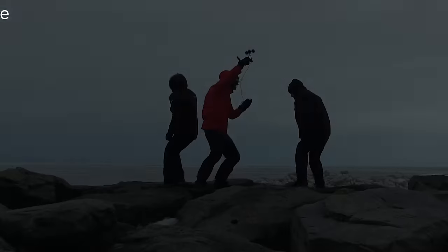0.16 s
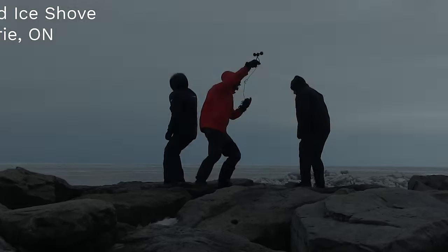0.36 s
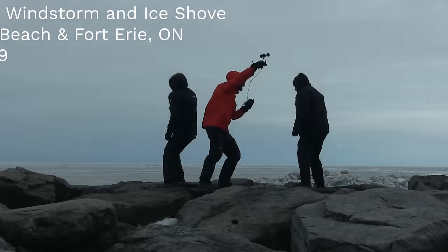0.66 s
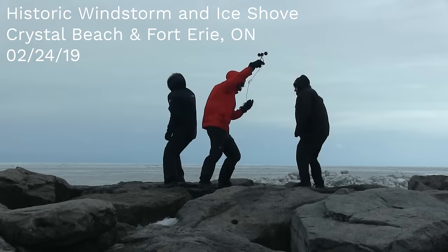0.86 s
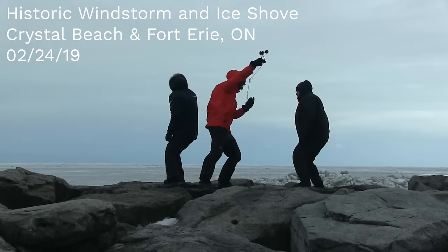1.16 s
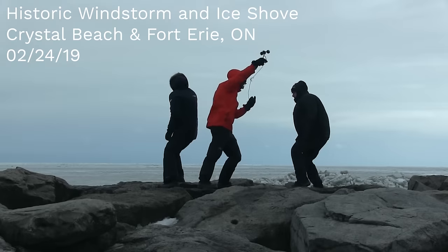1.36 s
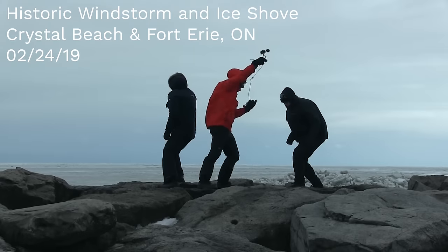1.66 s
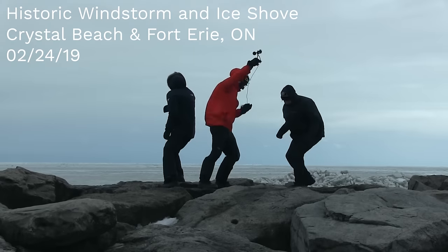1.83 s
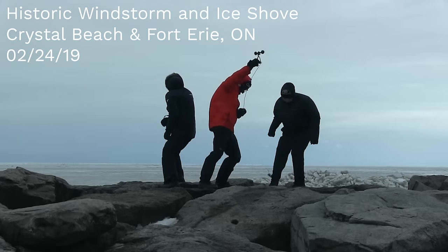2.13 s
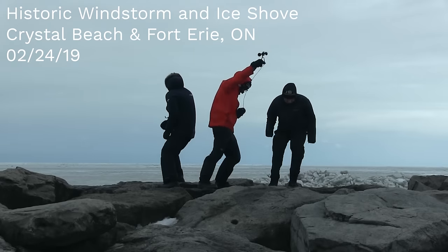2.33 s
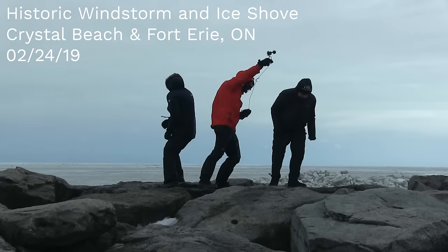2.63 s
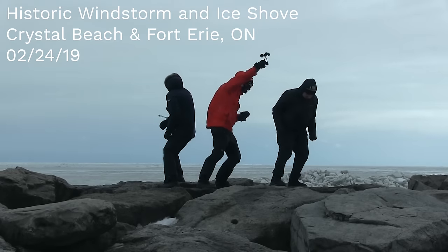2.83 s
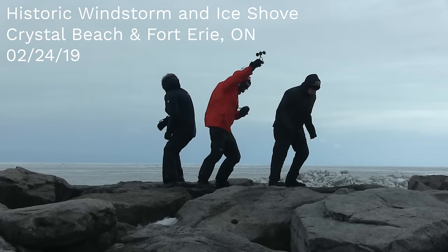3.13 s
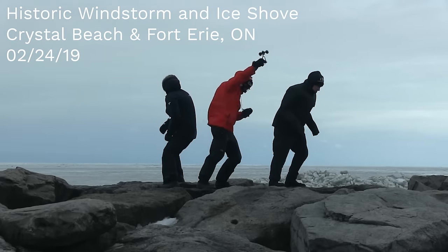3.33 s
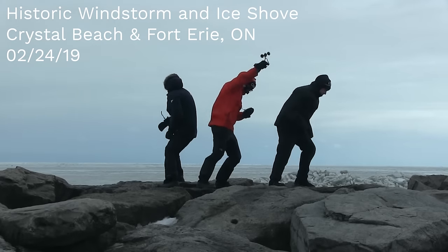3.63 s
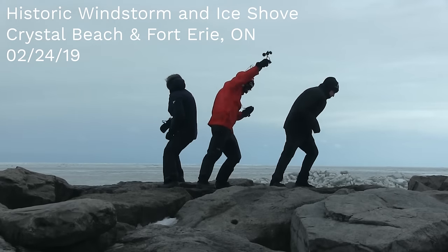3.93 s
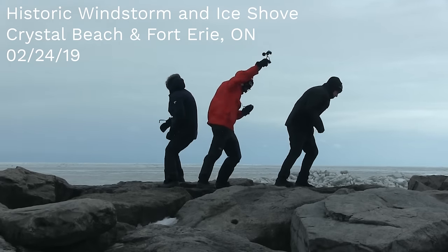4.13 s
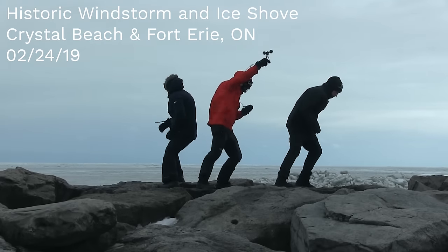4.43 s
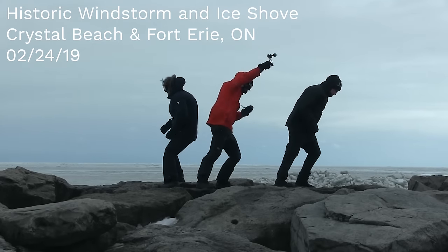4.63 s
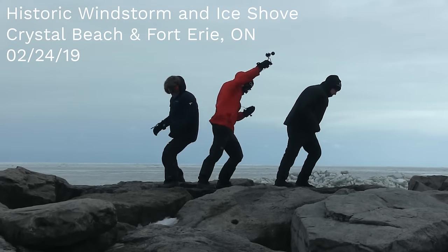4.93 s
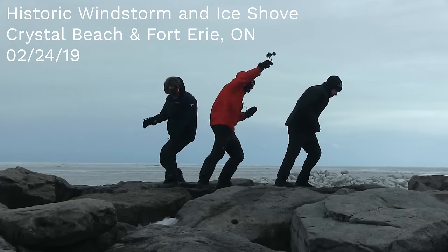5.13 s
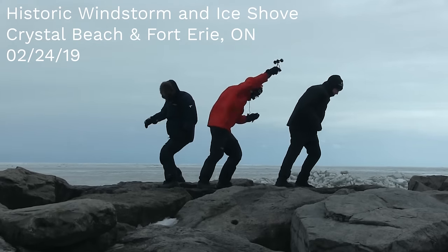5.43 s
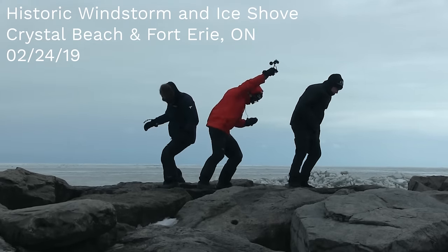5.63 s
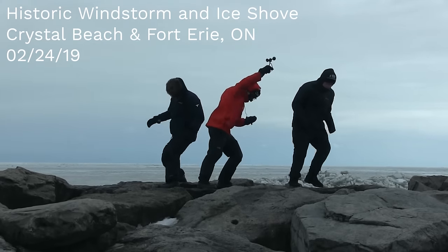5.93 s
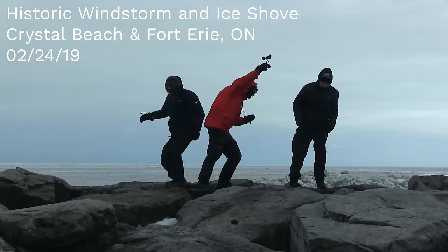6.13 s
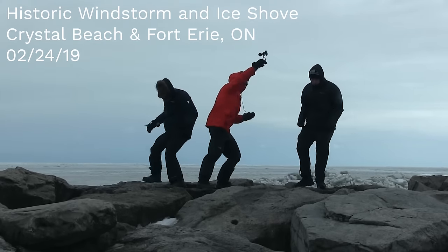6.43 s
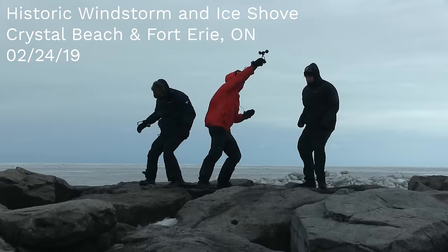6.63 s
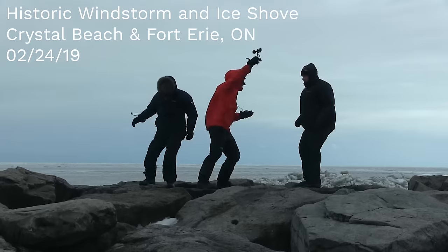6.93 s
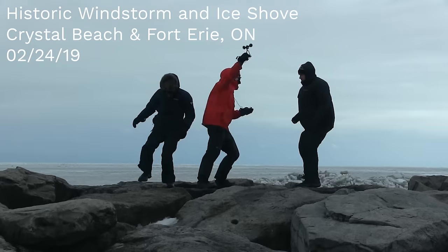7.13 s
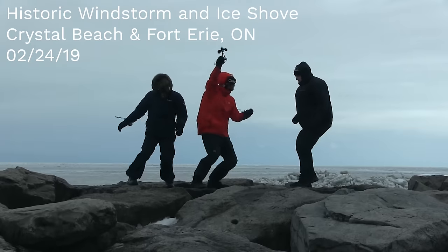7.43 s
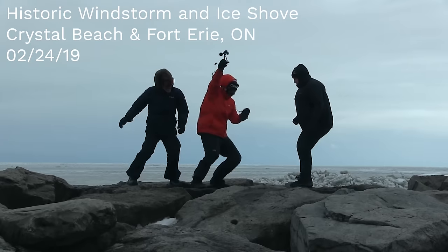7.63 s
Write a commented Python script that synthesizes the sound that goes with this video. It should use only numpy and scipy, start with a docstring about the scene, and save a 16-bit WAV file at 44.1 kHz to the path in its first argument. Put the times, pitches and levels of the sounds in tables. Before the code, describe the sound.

Storm wind on an open shore fades in over the first half second and blows across the microphone as a loud, deep roar for nearly eight seconds. It swells and dips unevenly, with low buffeting underneath, a thin hiss on top and very faint scattered ticks of grit. A faint whistle rides the gusts and weakens at about 3.5 seconds. Near 1.7 seconds loose clothing snaps and a bright spatter of spray or grit strikes the microphone. The gusts are strongest around 2, 3.5 and 7.2 seconds. More short cloth flaps come at about 4.4, 5.4, 5.9 and 6.5 seconds, with light patters scattered between 4 and 7 seconds. Hard gusts thump the microphone at about 4.5 seconds, most strongly at 5.5, and twice just after 7. The roar continues to the end.

```python
"""A deep, gusting roar: storm wind on an open shore blows across a pair of microphone ports.
Big eddies buffet, smaller ones roar, rush and whoosh through the cavities of the housing, the finest
turbulence hisses, and the port edges whistle faintly until the wind veers. Now and then the hardest
eddies thump the diaphragms, loose cloth flaps, and spray or grit patters on the housing."""
import sys
import numpy as np
from scipy import signal
from scipy.fft import rfft, irfft, next_fast_len
from scipy.io import wavfile

SR = 44100
rng = np.random.default_rng(int(sys.argv[2]) if len(sys.argv) > 2 else 0)


def wrap_up_sound(samples):
    """Save the sound to the file named by the first command line argument, as 16-bit audio."""
    columns = np.atleast_2d(samples).T
    # keep every value between -1 and 1, then stretch to whole-number steps
    tamed = np.clip(columns, -1, 1)
    steps = np.round(tamed * 32767).astype(np.int16)
    wavfile.write(sys.argv[1], SR, steps)


N = 342657

# strength of the gusts: time_s, rush_db, roar_over_rush_db, hiss_over_rush_db
GUSTS = [(0.4, -23, 7.5, -22), (0.62, -21.5, 5.5, -21.5), (1.1, -22, 6.5, -22), (1.5, -21.5, 8.5, -24.5),
         (1.9, -19, 5.5, -23), (2.1, -21, 8, -24.5), (2.36, -20, 7.5, -26.5), (2.56, -24, 8, -24),
         (3.15, -22.5, 5.5, -25), (3.45, -20, 6, -25.5), (3.63, -19.5, 6, -25.5), (3.73, -25, 11, -23.5),
         (4.2, -23.5, 10.5, -25), (4.55, -23.5, 7.5, -25), (4.8, -21.5, 8.5, -26), (5.05, -24, 9, -24.5),
         (5.3, -26.5, 9, -24.5), (5.5, -24.5, 9, -23.5), (5.75, -26.5, 8, -25), (6.05, -23.5, 7, -23.5),
         (6.3, -27.5, 10.5, -23.5), (6.42, -23.5, 8.5, -23.5), (6.52, -21.5, 7, -22.5),
         (6.88, -25, 8.5, -22), (7.05, -22.5, 8.5, -23), (7.17, -19, 7.5, -22.5), (7.26, -21.5, 6.5, -22),
         (7.38, -21, 6.5, -23), (7.58, -24.5, 11.5, -23), (7.77, -26.5, 9, -27)]
# likeness of the pressure at the two ports: frequency_hz, correlation (0-1)
PORT_CORRELATION = [(25, .99), (42, 0.93), (65, 0.83), (130, 0.92), (290, 0.87), (640, 0.72), (1300, 0.8),
                    (2200, 0), (3300, 0.56), (6800, 0.52), (15000, 0.67)]


def wind():
    """Turbulence: smaller eddies sound higher, and cavity resonances colour their pressure noise."""
    # spectrum of the turbulence: frequency_hz, density_db
    turbulence = [(11, -46), (18, -29), (42, -6.5), (85, -7.5), (150, 2.5), (243, -3.5), (313, -3.5),
                  (820, -14.5), (1400, -22), (1810, -25.5), (2470, -31.5), (3190, -31.5), (4740, -45),
                  (9890, -59), (15600, -73)]
    # resonances of the housing: centre_hz, width_hz, lift_db
    cavities = [(184, 58, 3), (307, 250, 3.5), (747, 53, 3.5), (1037, 200, 3.5), (1335, 170, 5),
                (1490, 150, 5.5), (3550, 90, 1), (4050, 200, 1), (4830, 500, -1), (5700, 600, 3),
                (6600, 400, 2.5), (7200, 300, -1.5), (8200, 130, 1.5), (9100, 300, 1), (10030, 150, 3)]
    # band of each eddy size: low_hz, high_hz
    eddy_bands = [(25, 100), (100, 220), (220, 560), (560, 1900), (2200, 4600), (4600, 9000), (9000, 15000)]
    # spread of the level flicker: frequency_hz, shared_db, own_db
    flicker = [(30, 0, 1), (300, 0.9, 0.35), (2000, 0.8, 0.35), (12000, 0.7, 0.9)]
    size = next_fast_len(N)
    hz = bin_frequencies(size)
    colour_db = at_hz(turbulence, hz)
    for centre_hz, width_hz, lift_db in cavities:
        colour_db = colour_db + lift_db * resonance(hz, centre_hz, width_hz)
    pressure = from_db(colour_db) * stereo_noise(hz, size, at_hz(PORT_CORRELATION, hz))
    power = 2 * np.abs(pressure.mean(0)) ** 2 / size ** 2
    eddy_gains_db = [level_db - 10 * np.log10(power[(hz > low) & (hz < high)].sum())
                     for level_db, (low, high) in zip(eddy_levels(), eddy_bands)]
    eddy_octaves = np.log2([np.sqrt(low * high) for low, high in eddy_bands])
    eddies = np.arange(len(eddy_bands))
    shared_drift = drift(corner_hz=14.6)
    out, step_octaves = 0, .7
    for octave in np.arange(4, 14.6, step_octaves):
        band = np.clip(1 - np.abs(np.log2(hz) - octave) / step_octaves, 0, 1)
        place = np.interp(octave, eddy_octaves, eddies)
        weights = np.clip(1 - np.abs(place - eddies), 0, 1)   # blend the two nearest eddy sizes
        shared_db, own_db = at_hz(flicker, 2 ** octave)
        gain_db = weights @ eddy_gains_db + shared_db * shared_drift + own_db * drift(corner_hz=3.0)
        out = out + from_db(gain_db) * irfft(band * pressure, size)[:, :N]
    return out


def eddy_levels():
    """Energy cascade: a gust feeds eddies of every size. Levels in dB, largest eddies first."""
    # division of the roar: time_s, deep_over_roar_db, upper_over_roar_db
    roar_halves = [(0, -2, -2), (1.1, -2.5, -1), (1.6, -6.5, -4), (2.3, -4, -1), (2.9, -0.5, -0.5),
                   (3.5, -5, -2.5), (4.0, -5, -2), (4.7, -2, -1.5), (5.1, -5, -2.5), (5.5, -3, -1.5),
                   (5.9, -2, -2.5), (6.3, -4.5, -4.5), (6.6, -4.5, -3), (7.1, -3.5, -1), (7.4, -3.5, -3),
                   (7.77, -5, -2.5)]
    # largest and smallest eddies: time_s, buffet_over_roar_db, finest_over_hiss_db
    extremes = [(0, -9, -12.5), (.6, -11, -8.5), (1.2, -13.5, -7), (1.9, -11, -8), (2.6, -8, -6.5),
                (3.2, -15, -7), (3.8, -11, -11), (4.4, -10, -9), (4.9, -13, -8.5), (5.5, -8.5, -8.5),
                (6.0, -10, -7), (6.6, -11.5, -8), (7.0, -13, -8.5), (7.2, -14, -8.5), (7.45, -17, -11),
                (7.77, -6, -5)]
    rush, roar_over, hiss_over = in_time(GUSTS)
    roar, hiss = rush + roar_over, rush + hiss_over
    deep, upper = in_time(roar_halves)
    buffet_over, finest_over = in_time(extremes)
    roar_lift, buffet_lift = shoves()
    swing = 0.97 * rush + 0.03 * hiss
    whoosh = -40 + swing - swing.mean()
    return [roar + buffet_lift + buffet_over, roar + roar_lift + deep, roar + roar_lift + upper,
            rush, whoosh, hiss, hiss + finest_over]


def shoves():
    """Dynamic pressure: a big eddy hitting square on shifts roar and buffet along a bell curve in dB."""
    # eddy impacts: time_s, roar_lift_db, buffet_lift_db
    impacts = [(.46, 1.5, 2), (.89, 0.5, -5), (1.05, 0.5, 4), (1.33, 2, 6), (1.69, 4, 0), (1.82, 3.5, 7),
               (2.2, 3, -2), (2.29, 1.5, -3), (2.4, 0, 3), (2.47, 0.5, -2), (2.84, 2.5, 6), (3.27, 2.5, 9),
               (3.48, 6.5, 5), (3.58, 3.5, 8), (3.92, 5, 5), (4.47, 4.5, -5), (4.88, -1.5, 5),
               (5.5, 1.5, 5), (5.66, -1, 8), (6.0, 3, 3), (6.74, 2, 10), (7.09, 1, -0.5), (7.18, 3.5, 4),
               (7.33, 4.5, 9)]
    centres_s, *lifts_db = np.transpose(impacts)
    t = np.arange(0, N + 64, 64) / SR
    curves = []
    for lift_db, width_s in zip(lifts_db, (0.025, .05)):   # the buffet lasts longer
        bells = np.exp(-.5 * ((t - centres_s[:, None]) / width_s) ** 2)
        curves.append(np.interp(np.arange(N) / SR, t, lift_db @ bells))
    return curves


def thumps():
    """Pressure pulse: each of the hardest eddies sucks at the diaphragms and then pushes."""
    # pulses: centre_s, envelope_peak_db, pitch_hz
    pulses = [(4.482, -6, 190), (5.5085, 0, 160), (7.087, -7, 140), (7.33, -8, 140)]
    out, width_cycles = 0, .55
    for centre_s, peak_db, pitch_hz in pulses:
        cycles = (np.arange(N) / SR - centre_s) * pitch_hz
        envelope = from_db(peak_db) * np.exp(-.5 * (cycles / width_cycles) ** 2)
        out = out + envelope * np.sin(2 * np.pi * cycles)
    return out


def flaps():
    """Sudden tension: loose cloth snaps taut in the gusts and radiates a midrange burst."""
    # snaps: start_s, peak_db, hold_s, tilt_db_per_octave
    snaps = [(1.6594, -15, 0.035, 0.5), (4.4194, -25, 0.016, 8), (5.378, -24, 0.022, 5.5),
             (5.8634, -17.5, 0.02, 5.5), (6.464, -14, 0.025, 0)]
    # spectrum of the cloth: frequency_hz, density_db
    colour = [(410, -35), (700, 2.5), (997, 2), (1740, -13.5), (2250, -16.5), (2680, -14.5), (5000, -41),
              (6500, -68), (11000, -120)]
    return bursts(snaps, colour, pivot_hz=1800, correlation=.6, tail_db=-10.0)


def spray():
    """Impact noise: handfuls of drops or grit strike the housing in bright bursts."""
    # handfuls: start_s, peak_db, hold_s, tilt_db_per_octave
    handfuls = [(1.648, -29, .03, -5.5), (1.766, -14, 0.013, -1.5), (4.205, -37, .01, 0),
                (4.395, -27, 0.038, -6.5), (4.707, -29, .016, -6), (5.01, -40, .03, 0),
                (5.4425, -30, .025, -6), (5.72, -44, .006, 8), (5.859, -33, .016, -3),
                (5.891, -53, .003, 2), (5.938, -31, 0.0045, 2), (6.475, -34, .02, -4),
                (7.193, -29.5, 0.01, -1)]
    # spectrum of the impacts: frequency_hz, density_db
    colour = [(1060, -36), (1800, -8), (2490, -5), (3150, -3), (4900, -8.5), (5800, -2.5), (7500, 0),
              (10000, -6), (12000, -13), (15600, -14)]
    return bursts(handfuls, colour, pivot_hz=7000, correlation=0.37, tail_db=-21.0)


def whistle():
    """Resonance: flow noise excites narrow modes, which weaken as the wind veers off the port edges."""
    # modes: centre_hz, width_hz, relative_db, change_after_veer_db
    modes = [(1015, 39, -5, -2.5), (1284, 190, -1.5, -12.5), (1377, 53, -0.5, -5), (1790, 490, -9.5, -15),
             (3130, 60, -17.5, -3), (4120, 150, -28, -4)]
    veer_start_s, veer_length_s = 3.4, 0.097
    veered = np.clip((np.arange(N) / SR - veer_start_s) / veer_length_s, 0, 1)
    size = next_fast_len(N)
    hz = bin_frequencies(size)
    out = 0
    for centre_hz, width_hz, level_db, veer_db in modes:
        noise = stereo_noise(hz, size, at_hz(PORT_CORRELATION, hz))
        tone = irfft(resonance(hz, centre_hz, width_hz) * noise, size)[:, :N]
        out = out + from_db(level_db + veer_db * veered) * tone / tone.std()
    rush_db = in_time(GUSTS)[0]
    return from_db(-33 + 0.7 * (rush_db - rush_db.mean())) * out   # swells with the gusts


def grit():
    """Poisson process: blown grains tick on the housing at random, each a puff of bright noise."""
    grains_per_s, t60_s, band_hz = 8, .02, [5000, 14500]
    arrivals = rng.random(N) < grains_per_s / SR
    strength_db = -58 + 3 * np.minimum(rng.exponential(1, N), 3)
    hits = arrivals * from_db(strength_db)
    envelope = signal.lfilter([1], [1, -from_db(-60 / (t60_s * SR))], hits + 1e-18)
    bandpass = signal.butter(2, band_hz, "band", fs=SR, output="sos")
    bright = signal.sosfilt(bandpass, rng.standard_normal((2, N)))
    return envelope * (bright + bright[0]) / 2


def bursts(events, colour, pivot_hz, correlation, tail_db):
    """Two-stage exponential decay: each noise burst holds, drops quickly and leaves a fainter tail."""
    attack_s, drop_t60_s, tail_t60_s = 0.0018, 0.039, 0.35
    crest_db = 9   # allowance for peak over rms
    out, size = np.zeros((2, N)), 16384
    t = np.arange(size) / SR
    hz = bin_frequencies(size)
    for start_s, peak_db, hold_s, tilt in events:
        shape_db = at_hz(colour, hz) + tilt * np.log2(hz / pivot_hz)
        noise = irfft(from_db(shape_db) * stereo_noise(hz, size, correlation), size)
        decay_s = np.clip(t - hold_s, 0, None)
        decay = from_db(-60 * decay_s / drop_t60_s) + from_db(tail_db - 60 * decay_s / tail_t60_s)
        envelope = np.clip(t / attack_s, 0, 1) * decay
        burst = from_db(peak_db - crest_db) * envelope * noise / noise.std()
        start = round(start_s * SR)
        out[:, start:start + size] += burst[:, :N - start]
    return out


def stereo_noise(hz, size, correlation):
    """Partial coherence: left and right spectra are the sum and difference of two noises."""
    # imbalance of the ports: frequency_hz, left_minus_right_db
    imbalance = [(30, 1), (60, -2.5), (120, -1.5), (240, -2), (480, -1.5), (950, -1.5), (1890, -1),
                 (3770, 0.5), (7520, -0.5), (15000, 0)]
    mid, side = rfft(rng.standard_normal((2, size)))
    correlation = np.clip(correlation, 0, 1)
    pair = np.sqrt(1 + correlation) * mid + np.sqrt(1 - correlation) * side * [[1], [-1]]
    lean = from_db(at_hz(imbalance, hz) / 2)
    return pair * [lean, 1 / lean]


def drift(corner_hz):
    """Low-passed noise: two equal poles give a slow random wander of unit spread."""
    hop, settling_steps = 40, 2000
    pole = np.exp(-2 * np.pi * corner_hz * hop / SR)
    noise = rng.standard_normal(N // hop + settling_steps + 2)
    slow = signal.lfilter([1], [1, -2 * pole, pole * pole], noise)[settling_steps:]
    return np.interp(np.arange(N) / hop, np.arange(len(slow)), slow / slow.std())


def resonance(hz, centre_hz, width_hz):
    """Lorentzian curve: 1 at the centre, width_hz wide at half height."""
    return 1 / (1 + (2 * (hz - centre_hz) / width_hz) ** 2)


def bin_frequencies(size):
    """Fourier bin frequencies, held at 1 Hz or above."""
    return np.maximum(np.arange(size // 2 + 1) * SR / size, 1)


def from_db(db):
    """Decibels to amplitude ratio."""
    return 10 ** (np.asarray(db) / 20)


def at_hz(points, hz):
    """Columns of a table interpolated on a log-frequency axis."""
    points_hz, *columns = np.transpose(points)
    return np.squeeze([np.interp(np.log(hz), np.log(points_hz), column) for column in columns])


def in_time(rows):
    """Columns of a table interpolated to one value a sample."""
    times_s, *columns = np.transpose(rows)
    return [np.interp(np.arange(N) / SR, times_s, column) for column in columns]


def scene():
    """Superposition: all sources add at the two ports, wind and whistle swinging between them."""
    # swing of the wind, taken about its mean: time_s, left_minus_right_db
    balance = [(0, -1), (1.5, -0.5), (2.2, -2), (5.0, -1.8), (6.0, -1.6), (7.1, -1.5), (7.77, -1)]
    lean_db, = in_time(balance)
    swing = from_db((lean_db - lean_db.mean()) / 2 * [[1], [-1]])
    return swing * (wind() + whistle()) + spray() + grit() + flaps() + thumps()


def record(dry):
    """Soft saturation: after a fade-in the input stage rounds the peaks, and a low-pass cuts the top."""
    fade_s, fade_from_db = 0.39, -12.5
    saturation_level, cutoff_hz = 1.05, 15760
    fade_left = np.clip(1 - np.arange(N) / SR / fade_s, 0, 1)
    faded = dry * from_db(fade_from_db * fade_left ** 1.37)
    rounded = faded / (1 + np.abs(faded / saturation_level) ** 8) ** .125
    lowpass = signal.ellip(14, .3, 80, cutoff_hz, fs=SR, output="sos")
    return np.clip(signal.sosfilt(lowpass, rounded), -1, 1)


dry = scene()
out = record(dry)
wrap_up_sound(out)
```